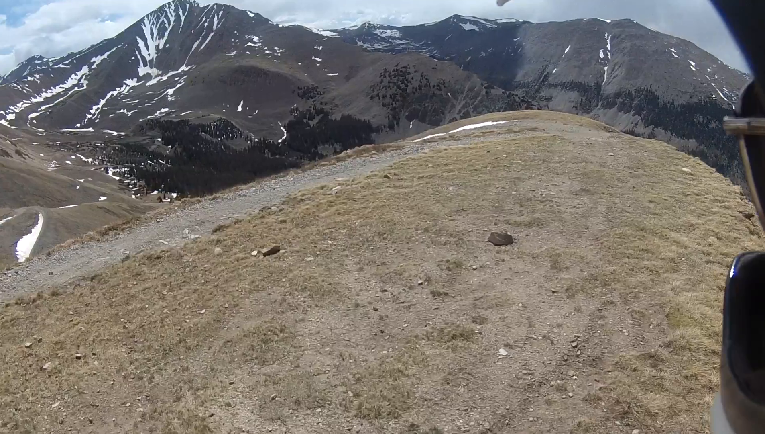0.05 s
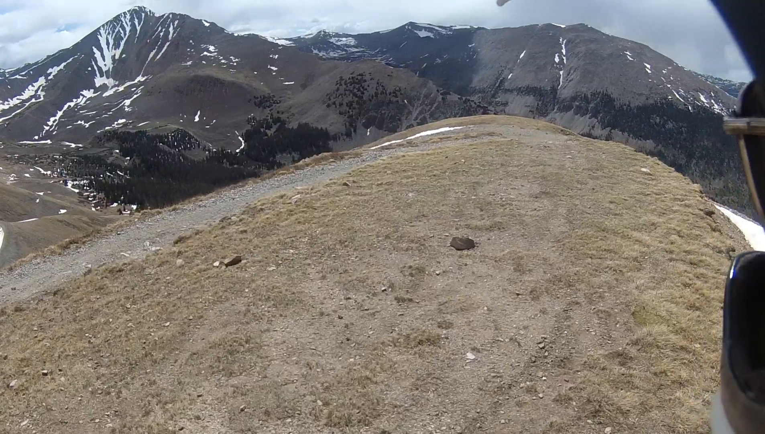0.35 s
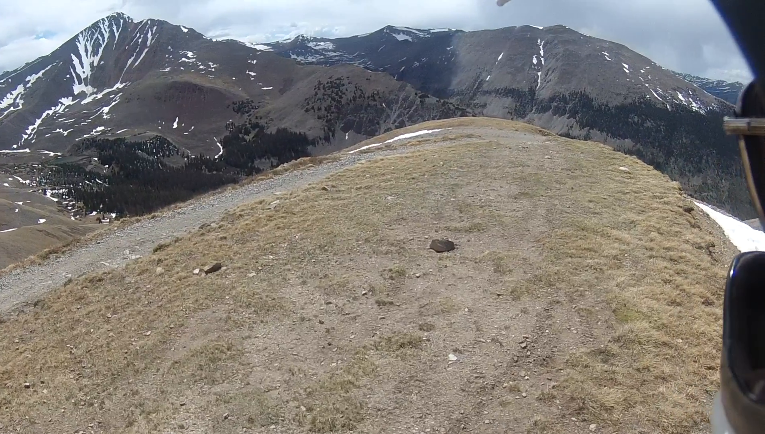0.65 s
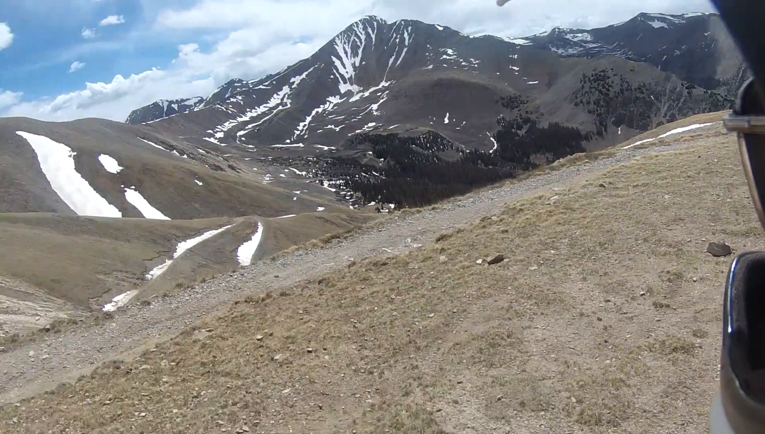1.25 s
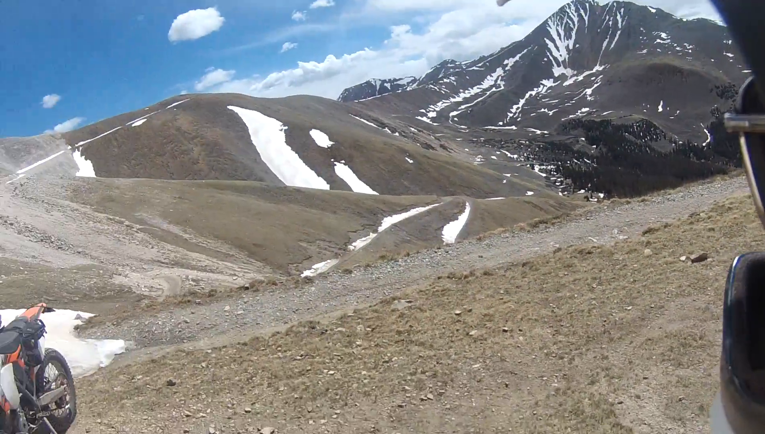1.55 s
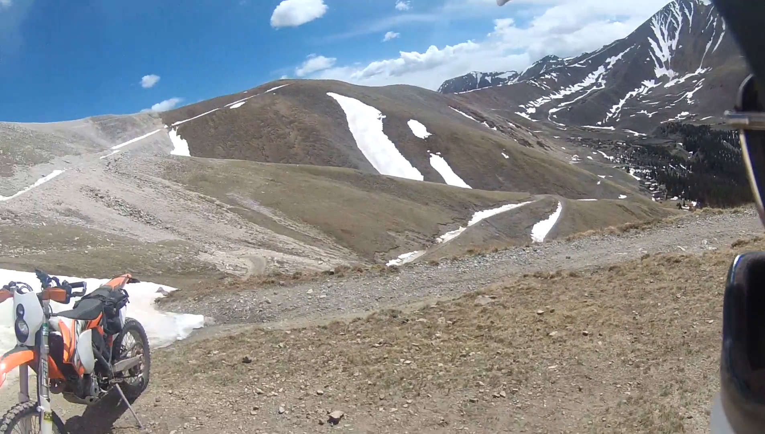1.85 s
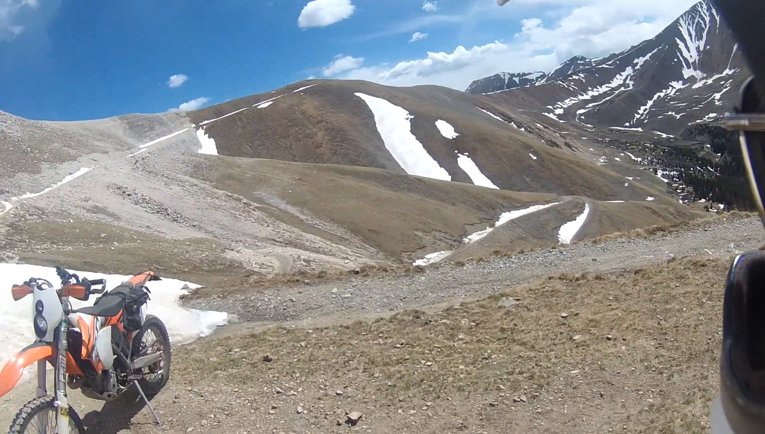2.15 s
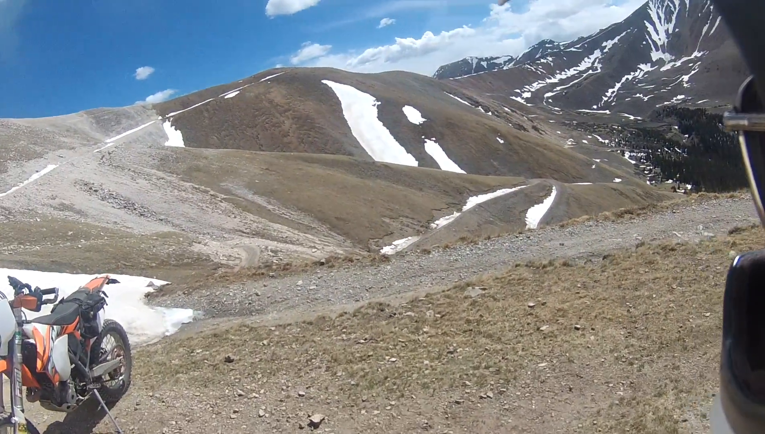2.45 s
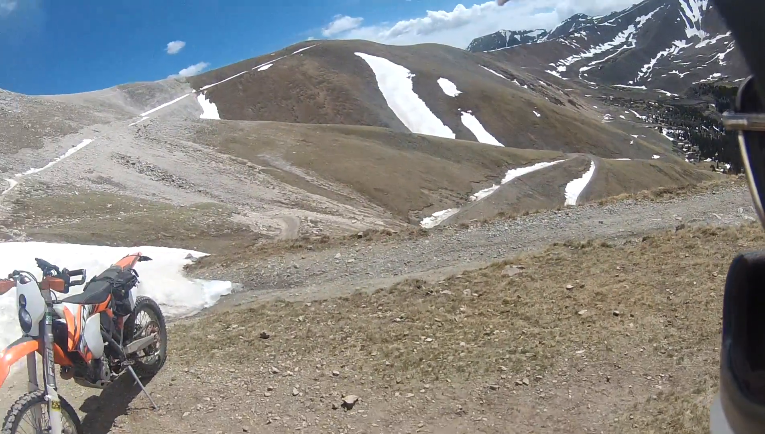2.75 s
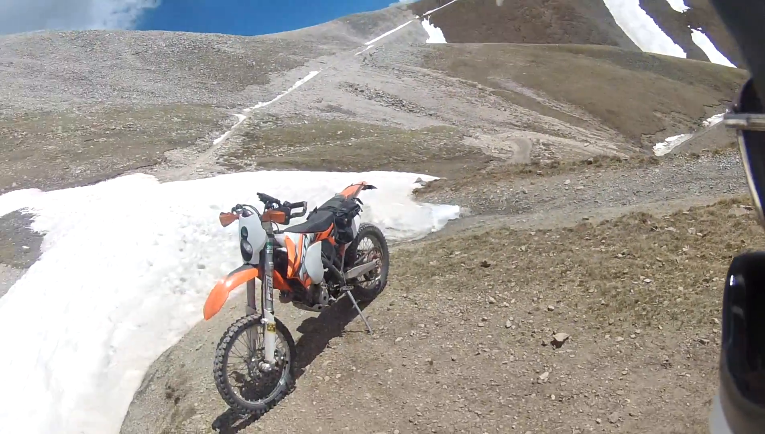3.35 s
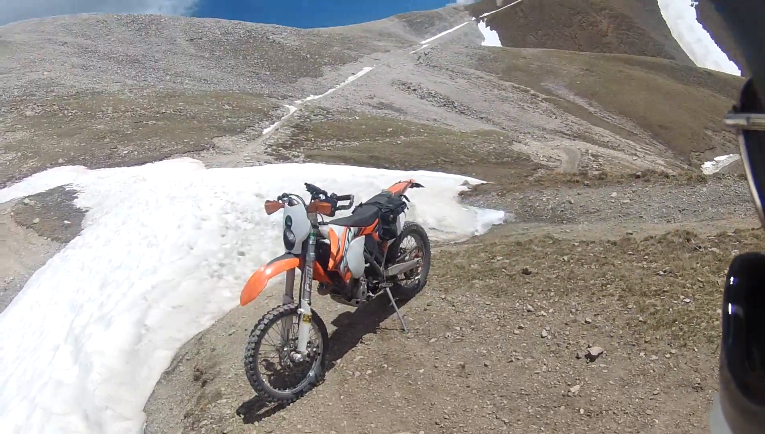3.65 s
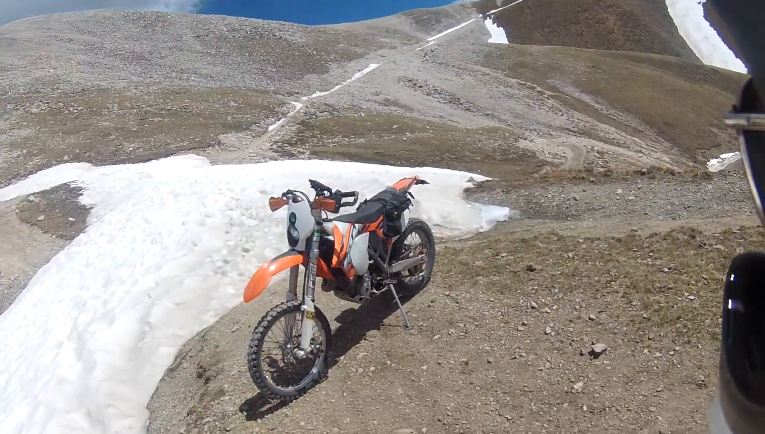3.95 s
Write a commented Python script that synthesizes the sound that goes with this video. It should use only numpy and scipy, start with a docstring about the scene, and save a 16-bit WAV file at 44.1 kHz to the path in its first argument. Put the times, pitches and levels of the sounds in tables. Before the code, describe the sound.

Wind buffets the microphone on an open mountain ridge. A few light puffs give way to one long, strong gust that rumbles, flutters and crackles right on the microphone, then drops to a lull.

```python
"""Wind buffeting a microphone

On an open mountain ridge come a few light puffs, one long gust, then a lull. Turbulent eddies exert a
fluctuating pressure on the microphone port: large ones rumble and thump, small ones slap and flutter in
ragged bursts that brighten as the wind rises. At the height of the gust the flow snaps and crackles.
Faint edge whistles, distant wind and a steady hiss lie underneath."""
import sys
import numpy as np
from scipy import signal
from scipy.fft import rfft, irfft
from scipy.io import wavfile
from scipy.ndimage import uniform_filter1d

SR = 44100
rng = np.random.default_rng(int(sys.argv[2]) if len(sys.argv) > 2 else 0)


def waveform_to_disk(signal):
    """Save audio, clipped to [-1, 1], as 16-bit WAV at the path in sys.argv[1]."""
    frames = np.transpose(np.atleast_2d(signal))
    scaled = np.clip(frames, -1, 1) * 32767
    samples = np.round(scaled).astype(np.int16)
    wavfile.write(sys.argv[1], SR, samples)


N = 176400

# single eddies striking the port: t/s, relative peak level/dB, f/Hz
EDDY_IMPACTS = [(0.073, -44.5, 680), (0.096, -39, 920), (0.12, -40, 930), (0.139, -55, 750),
                (0.154, -38, 610), (0.173, -40, 447), (0.256, -39.5, 430), (0.356, -40, 690),
                (0.37, -44, 900), (0.407, -40.5, 670), (0.767, -40.5, 513), (0.787, -34, 390),
                (0.858, -44, 740), (0.897, -37.5, 730), (0.934, -37, 1120), (0.952, -31, 1050),
                (0.955, -30, 980), (0.972, -32, 700), (0.991, -43, 645), (1.3066, -19.5, 1090),
                (1.3615, -27.5, 1410), (1.372, -29, 645), (1.3803, -23.5, 1230), (1.3868, -26, 1250),
                (1.4029, -32, 1370), (1.5702, -25, 1110), (1.624, -20, 1230), (1.6849, -22, 1030),
                (1.7813, -19, 1320), (1.924, -23.5, 1100), (2.0687, -20, 1350), (2.1443, -18.5, 1080),
                (2.2874, -12, 1450), (2.3404, -19, 1330), (2.76, -23.5, 1120), (2.7983, -17, 1470),
                (3.058, -34, 1130), (3.0878, -28.5, 1180), (3.217, -25, 1320), (3.25, -26, 910),
                (3.421, -33.5, 1010), (3.44, -32, 940), (3.525, -33, 1010), (3.56, -33, 1040),
                (3.749, -37.5, 643), (3.818, -37.5, 890)]


def from_db(db):
    """Amplitude ratio: a factor of ten for every 20 dB."""
    return 10 ** (np.asarray(db) / 20)


def rms_one(x):
    """Normalisation to unit rms."""
    return x / np.sqrt(np.mean(x ** 2) + 1e-20)


def in_time(rows):
    """Linear interpolation of (t/s, value) rows at every sample."""
    return np.interp(np.arange(N) / SR, *np.transpose(rows))


def at_hz(points, hz):
    """Interpolation of (f/Hz, level/dB) rows on a logarithmic frequency axis."""
    f, db = np.transpose(points)
    return np.interp(np.log(hz), np.log(f), db)


def drift(rate_hz):
    """Random modulation: low-passed noise of spread near 1, its extremes softly limited."""
    step, run_in = 10, 4000
    pole = np.exp(-2 * np.pi * step * rate_hz / SR)
    white = rng.standard_normal(N // step + run_in + 2)
    slow = rms_one(signal.lfilter([1], [1, -2 * pole, pole * pole], white)[run_in:])
    return 3 * np.tanh(np.interp(np.arange(N) / step, np.arange(len(slow)), slow) / 2.7)


def bands(spectrum):
    """Third-octave analysis: (centre f/Hz, filter, gain) for each band, with total power 1."""
    edges = 17 * 2 ** (np.arange(31) / 3)
    low, high = edges[:-1], edges[1:]
    hz = np.sqrt(low * high)
    inside = (high > spectrum[0][0]) & (low < spectrum[-1][0])
    gain = from_db(at_hz(spectrum, hz)) * np.sqrt(high - low) * inside
    gain = gain / np.linalg.norm(gain)
    return [(hz[k], signal.butter(2, [low[k], high[k]], "band", fs=SR, output="sos"), gain[k])
            for k in np.flatnonzero(inside)]


def band_noise(sos):
    """Band-limited noise of unit rms; two filters in cascade steepen its sides."""
    run_in = SR // 4
    return rms_one(signal.sosfilt(np.vstack([sos, sos]), rng.standard_normal(N + run_in))[run_in:])


def coloured(x, spectrum):
    """Minimum-phase filtering to a given spectrum, at unit rms."""
    size = 2048
    hz = np.arange(size // 2 + 1) * SR / size + 1
    cepstrum = irfft(np.log(from_db(at_hz(spectrum, hz))))
    cepstrum[1:size // 2] *= 2   # folding the cepstrum makes the filter causal
    cepstrum[size // 2 + 1:] = 0
    response = irfft(np.exp(rfft(cepstrum)))
    return rms_one(signal.fftconvolve(x, response)[:N])


def evened(x, settle_s):
    """Division by the running rms holds the slow level at 1 and keeps the fast unevenness."""
    size = int(settle_s * SR)
    return x / np.sqrt(uniform_filter1d(uniform_filter1d(x * x, size), size) + 1e-12)


def puff(s, hz, cycles):
    """Gaussian wave packet: a suction spike of depth 1 at time s, with swings to either side."""
    turn = (np.arange(N) / SR - s) * hz
    near, out = np.abs(turn) < cycles, np.zeros(N)
    out[near] = -np.exp(-(np.pi * turn[near] / cycles) ** 2) * np.cos(2 * np.pi * turn[near])
    return out


def hiss(hiss_db=-73, whine_hz=8000, whine_db=-94):
    """Noise floor: a steady broadband hiss with a thin pure tone in it."""
    # hiss spectrum: f/Hz, relative density level/dB
    spectrum = [(200, 3.5), (1200, 4.5), (2800, -1), (5000, -2), (8000, -2.5), (10000, -4), (12000, -1),
                (15000, -7)]
    whine = np.sqrt(2) * np.sin(2 * np.pi * whine_hz * np.arange(N) / SR)
    return from_db(hiss_db) * coloured(rng.standard_normal(N), spectrum) + from_db(whine_db) * whine


def far_wind():
    """Aerodynamic noise: wind over the slopes makes a smooth, faint rush."""
    # strength of the rush: t/s, level/dB
    levels = [(0, -66.5), (1.2, -71), (3.4, -70), (3.7, -74), (4, -76)]
    # its spectrum: f/Hz, relative density level/dB
    spectrum = [(150, 13.5), (400, -8), (1000, -0.5), (2000, -4.5), (2800, -11.5), (5000, -39)]
    return from_db(in_time(levels)) * coloured(rng.standard_normal(N), spectrum)


def whistle(levels, hz, width_hz):
    """Narrow-band noise is heard as a breathy pitch at its centre frequency."""
    sos = signal.butter(2, [hz - width_hz / 2, hz + width_hz / 2], "band", fs=SR, output="sos")
    return from_db(in_time(levels)) * band_noise(sos)


def edge_tones():
    """Edge tones: air flowing past an edge sings faintly."""
    # a breathy whistle: t/s, level/dB
    breathy = [(0, -80), (0.6, -89), (3.2, -77), (3.37, -79), (3.53, -76), (3.62, -96), (4, -98)]
    # a high sizzle at the crest of the gust: t/s, level/dB
    sizzle = [(0, -120), (2.15, -89), (2.28, -77), (2.52, -70.5), (2.58, -83), (4, -120)]
    return whistle(breathy, hz=1966, width_hz=97) + whistle(sizzle, hz=7560, width_hz=2000)


def sway():
    """Outer scale of turbulence: the largest eddies heave at the bottom of hearing, even in lulls."""
    # strength of the heave: t/s, level/dB
    levels = [(0, -47), (0.12, -42.5), (0.43, -54), (0.67, -45), (0.97, -49.5), (1.09, -55), (1.18, -55),
              (1.32, -32), (1.46, -50), (1.57, -35), (1.94, -39.5), (2.12, -30.5), (2.28, -41), (2.92, -37),
              (3.1, -42.5), (3.45, -40), (4, -45)]
    # its spectrum: f/Hz, relative density level/dB
    spectrum = [(12, -1), (20, 7.5), (30, -1), (48, 2), (65, 3), (100, -27.5)]
    heave = sum(gain * band_noise(sos) for _, sos, gain in bands(spectrum))
    return from_db(in_time(levels)) * evened(heave, settle_s=0.15)


def rumble(gain_db=-1.5, full_push_db=-24.5, rough_db=4.5, own_db=1.5, pivot_hz=132):
    """Dynamic pressure: large eddies push on the port in lumps, most uneven in their upper range."""
    # push of the large eddies: t/s, relative level/dB
    push = [(0, -45.5), (0.06, -60), (0.11, -46), (0.17, -39.5), (0.21, -53), (0.4, -54), (0.57, -57.5),
            (0.67, -45), (0.85, -48.5), (0.95, -39.5), (1.03, -56), (1.09, -60), (1.17, -56), (1.25, -38),
            (1.3, -34.5), (1.38, -32.5), (1.42, -34.5), (1.56, -31), (1.68, -29), (1.95, -29.5),
            (2.13, -27.5), (2.3, -29.5), (2.52, -26.5), (2.85, -33.5), (2.92, -25), (2.99, -34.5),
            (3.23, -29), (3.33, -37), (3.45, -38.5), (3.55, -39.5), (3.66, -45), (3.85, -43.5), (4, -43)]
    # rumble spectrum: f/Hz, relative density level/dB
    spectrum = [(45, -16), (70, -2), (100, 0), (140, -5), (210, -5.5), (300, -14), (450, -20.5),
                (800, -37.5)]
    brightening = 0.16   # dB per octave for each dB of push
    push_db, lumps, out = in_time(push), drift(rate_hz=14), 0
    for hz, sos, gain in bands(spectrum):
        tilt_db = brightening * (push_db - full_push_db) * np.log2(hz / pivot_hz)
        lump_db = rough_db * np.sqrt(hz / pivot_hz) * lumps
        out += gain * band_noise(sos) * from_db(tilt_db + lump_db + own_db * drift(rate_hz=21))
    return from_db(push_db + gain_db) * evened(out, settle_s=0.051)


def thumps(gain_db=-2):
    """Stagnation pressure: a large eddy lands squarely on the port with one soft, low shove."""
    # landings of large eddies: t/s, relative peak level/dB, f/Hz
    landings = [(0.154, -26.5, 167), (0.972, -33.5, 176), (1.3645, -22.5, 158), (2.29, -17, 217),
                (2.5431, -16, 224), (2.931, -19.5, 182), (3.224, -24, 165)]
    return -sum(from_db(db + gain_db) * puff(s, hz, cycles=1.4) for s, db, hz in landings)


def wakes(length_s=0.016, gain_db=-8, ceiling_db=-36):
    """Energy cascade: each slap comes wrapped in a brief, dull ruffle of smaller eddies."""
    # ruffle spectrum: f/Hz, relative density level/dB
    spectrum = [(250, 0), (600, -7), (1400, -27), (3500, -56)]
    s, db, _ = np.transpose(EDDY_IMPACTS)
    hits = np.bincount((s * SR).astype(int), from_db(np.minimum(db, ceiling_db) + gain_db), N)
    envelope = signal.fftconvolve(hits, np.hanning(int(length_s * SR)), "same")
    return envelope * coloured(rng.standard_normal(N), spectrum)


def slaps(gain_db=-1.5, push_db=-3, rebound_db=-18, lead_s=0.00178, lag_s=0.00166):
    """Pressure transient: a lone eddy hits the port with a low push, a dull pop, a brighter rebound."""
    spacings = rng.uniform(0.38, 1.47, (len(EDDY_IMPACTS), 2))
    out = np.zeros(N)
    for (s, db, hz), (early, late) in zip(EDDY_IMPACTS, spacings):
        push = -from_db(push_db) * puff(s - lead_s * early, 0.44 * hz, cycles=1.32)
        pop = puff(s, hz, cycles=1.32)
        rebound = from_db(rebound_db) * puff(s + lag_s * late, 1.56 * hz, cycles=1.36)
        out += from_db(db + gain_db) * (push + pop + rebound)
    return out


def snaps(gain_db=-6, body_db=10.5):
    """Flow separation: air snaps off the edge of the port in ticks well under a millisecond long."""
    # snaps of the flow: t/s, relative peak level/dB
    ticks = [(1.2998, -59), (1.3786, -50), (1.578, -36), (1.6187, -43), (1.6244, -45.5), (1.7593, -39.5),
             (1.9755, -42), (2.067, -37), (2.287, -37.5), (2.315, -41.5), (2.34, -46), (2.417, -37),
             (2.463, -42), (2.48, -38), (2.512, -45), (2.627, -40.5), (2.637, -39.5), (2.7364, -44),
             (2.755, -46), (2.789, -40), (2.799, -47), (2.813, -47), (2.837, -46), (3.219, -52)]
    out = np.zeros(N)
    for s, db in ticks:
        tip = puff(s, hz=7550, cycles=3.2)
        body = from_db(body_db) * puff(s, hz=3260, cycles=0.88)
        out += from_db(db + gain_db) * (tip + body)
    return out


def crackle(bursts, spits_per_s=800, spit_s=0.002, spread_db=5, burst_db=9, spits_db=4.5, air_db=-14):
    """Shot noise: the flow tears at the port in tiny spits of uneven size that merge into a rasp."""
    # strength of the treble crackle: t/s, relative level/dB
    levels = [(0, -105), (1.24, -100), (1.3, -71.5), (1.38, -72), (1.42, -102), (1.56, -101), (1.7, -82),
              (1.8, -73.5), (2.2, -69), (2.3, -61), (2.48, -62), (2.58, -65), (2.7, -70), (2.8, -55.5),
              (2.85, -65), (2.93, -62), (2.96, -92), (3.25, -84), (3.4, -105)]
    # its spectrum: f/Hz, relative density level/dB
    spectrum = [(1500, -3.5), (2800, 5), (4200, 2.5), (5500, -6), (8000, -8.5), (10000, -20), (15000, -26)]
    sizes = from_db(spread_db * np.minimum(rng.exponential(1, N), 3) + burst_db * bursts)
    onsets = rng.random(N) < spits_per_s / SR
    power = signal.fftconvolve(sizes ** 2 * onsets, np.hanning(int(spit_s * SR) + 3), "same")
    white_spits = np.sqrt(np.abs(power)) * rng.standard_normal(N)
    spits = evened(coloured(white_spits, spectrum), settle_s=0.083)
    air = coloured(rng.standard_normal(N), spectrum)
    return from_db(in_time(levels)) * (from_db(spits_db) * spits + from_db(air_db) * air)


def flutter(bursts, gain_db=1, full_gust_db=-30.5, rough_db=2.5, own_db=0.5, pivot_hz=716):
    """Intermittency: small eddies arrive in bursts across all bands; weak wind is duller, more ragged."""
    # strength of the gust: t/s, relative level/dB
    gust = [(0, -79), (0.06, -95), (0.11, -55.5), (0.16, -61), (0.2, -71), (0.37, -65.5), (0.44, -65.5),
            (0.55, -73), (0.7, -72), (0.8, -69.5), (0.89, -66), (0.96, -61.5), (1.03, -65.5), (1.15, -73),
            (1.285, -48.5), (1.303, -38.5), (1.35, -42), (1.372, -36.5), (1.4, -41.5), (1.42, -49),
            (1.53, -41.5), (1.62, -39.5), (1.8, -35.5), (2.03, -34.5), (2.24, -34.5), (2.29, -31.5),
            (2.36, -34), (2.45, -31), (2.66, -34.5), (2.81, -31), (2.85, -33.5), (2.935, -33),
            (2.96, -42.5), (3.1, -42.5), (3.23, -41), (3.32, -45), (3.37, -53.5), (3.52, -56.5), (3.6, -65),
            (3.7, -68), (3.77, -67.5), (3.9, -73), (4, -69)]
    # flutter spectrum at full gust: f/Hz, relative density level/dB
    spectrum = [(100, 4.5), (200, 2), (330, 3.5), (500, 2), (750, 0), (1100, -1), (1650, -3), (2200, -8.5),
                (2600, -20.5), (3150, -29.5), (4500, -42.5)]
    brightening = 0.25   # dB per octave for each dB of gust
    gust_db, out = in_time(gust), 0
    slack_db = np.minimum(gust_db - full_gust_db, 0)
    depth_db = rough_db - 0.75 * slack_db / 20
    for hz, sos, gain in bands(spectrum):
        burst_db = depth_db * (hz / pivot_hz) ** 0.9 * bursts   # smaller eddies come more unevenly
        tilt_db = brightening * slack_db * np.log2(hz / pivot_hz)
        eddies = band_noise(sos) * from_db(burst_db + own_db * drift(rate_hz=30))
        out += gain * from_db(tilt_db) * evened(eddies, settle_s=0.057)
    return from_db(gust_db + gain_db) * out


def scene():
    """Superposition in a free field: the wind acts right at the microphone, with no echoes."""
    bursts = drift(rate_hz=284)   # flutter and crackle surge together
    port = sway() + rumble() + flutter(bursts) + crackle(bursts) + thumps() + slaps() + wakes() + snaps()
    return (port + edge_tones() + far_wind() + hiss())[None]


def record(dry):
    """Band limiting: a steep low-pass cuts the top; the ends are eased over a few milliseconds."""
    cutoff_hz, ease_s = 15600, 0.004
    samples_from_end = np.minimum(np.arange(N), np.arange(N)[::-1])
    ease = np.minimum(1, samples_from_end / (ease_s * SR))
    return signal.sosfilt(signal.ellip(12, .1, 70, cutoff_hz, fs=SR, output="sos"), dry * ease)


dry = scene()
out = record(dry)
waveform_to_disk(out)
```